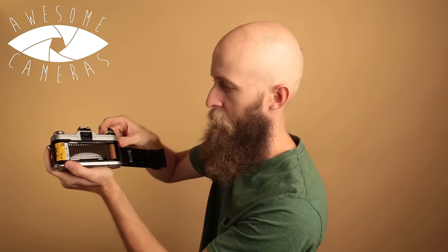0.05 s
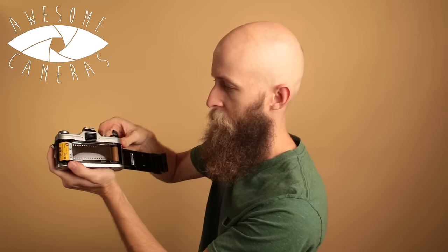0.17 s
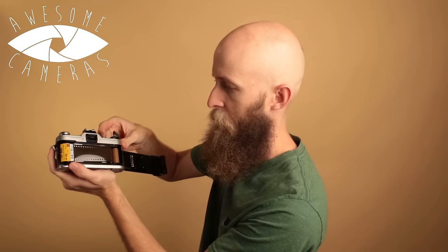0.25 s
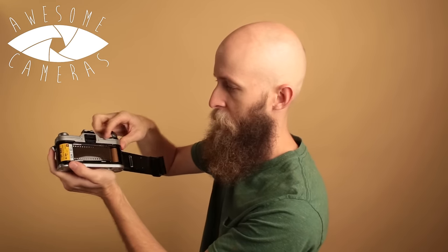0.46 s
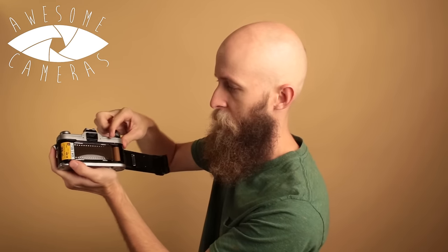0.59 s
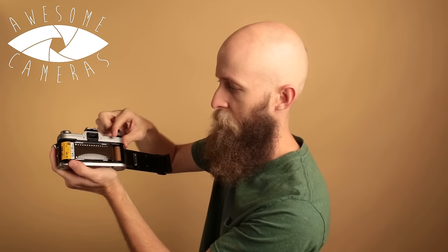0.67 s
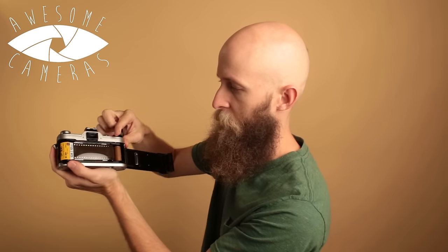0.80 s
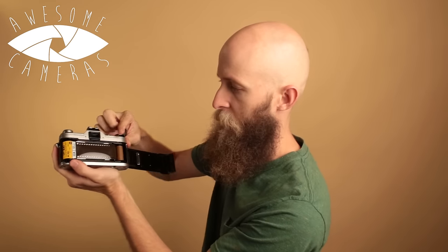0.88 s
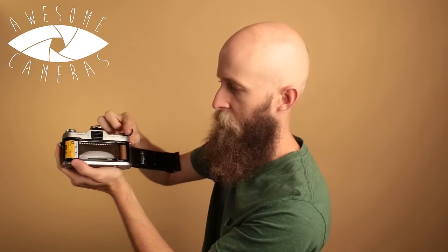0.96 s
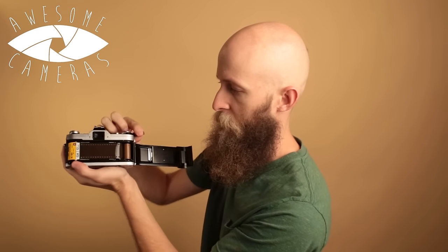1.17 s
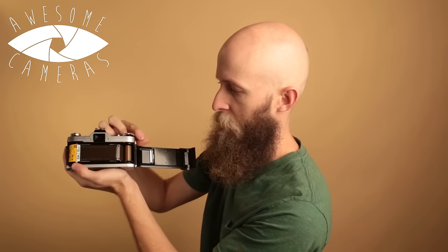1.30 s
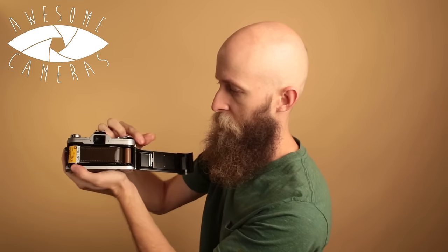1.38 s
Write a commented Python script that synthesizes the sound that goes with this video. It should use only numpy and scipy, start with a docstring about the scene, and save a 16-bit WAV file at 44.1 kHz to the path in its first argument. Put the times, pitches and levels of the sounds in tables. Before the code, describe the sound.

A film camera's mechanism clicks under someone's fingers. A sprung control snaps over and rattles to a stop with a knock, then a dial clicks, turns with a faint scrape and catches. Close, in a small, fairly echoey room.

```python
"""A film camera with its back open is worked by hand in a small, fairly echoey room.
A sprung control snaps over and rattles to a stop with a knock; fingers then click a dial, turn it
and let it catch. Each contact sounds the metal shell, a small steel spring and a bright crack,
and the camera rings on briefly. The sound is almost mono, over a faint hiss and hum."""
import sys
import numpy as np
from scipy import signal
from scipy.fft import rfft, irfft, next_fast_len
from scipy.io import wavfile
from scipy.ndimage import map_coordinates

SR = 44100
rng = np.random.default_rng(int(sys.argv[2]) if len(sys.argv) > 2 else 0)


def materialize(psi):
    """Save the field psi as 16-bit PCM at rate SR to the path in sys.argv[1].

    A 1-D psi becomes a single channel; in a 2-D psi each row is a channel.
    """
    bounded = np.clip(np.atleast_2d(psi).T, -1, 1)
    quanta = np.round(bounded * 32767).astype(np.int16)
    wavfile.write(sys.argv[1], SR, quanta)


N = 63945

# The tone colours of shell, spring, crack and hollow body. Each row: frequency in Hz, level in dB.
SHELL_COLOUR = [(100, -78.5), (600, -59), (1200, -31), (1800, -17.5), (2400, -8.5), (3000, -3.5), (3700, 4),
                (4300, -5.5), (6000, -10), (9000, -32.5)]
SPRING_COLOUR = [(400, -73), (2000, -53), (4000, -21), (4700, -6.5), (5050, 2), (5350, -1.5), (5700, -10.5),
                 (6500, -18.5), (9000, -35)]
CRACK_COLOUR = [(400, -63), (1500, -26), (5000, -3), (6500, -3), (8300, -3), (9400, -2), (10300, -3),
                (12300, -1.5), (14000, -10), (15400, -8), (16000, -14.5)]
BODY_COLOUR = [(60, -60), (180, -34), (300, -20.5), (410, -9), (540, -20.5), (700, -1.5), (1000, 2),
               (1400, -7), (2200, -9), (5000, -45.5)]


def amp(db):
    """Turn decibels into a gain."""
    return 10 ** (np.asarray(db) / 20)


def unit(x):
    """Scale a sound to an average (rms) level of 1."""
    return x / np.sqrt(np.mean(x ** 2) + 1e-20)


def along(points, hz):
    """Read between (Hz, value) points, with octaves evenly spaced."""
    freqs, values = np.transpose(points)
    return np.interp(np.log(hz + 1), np.log(freqs + 1), values)


def coloured(x, colour):
    """Filter a sound to give it a tone colour."""
    size = 2 * next_fast_len(len(x))
    gain = amp(along(colour, np.fft.rfftfreq(size, 1 / SR)))
    cepstrum = irfft(np.log(gain), size)
    # Folding this onto its first half makes the filter ring only after a hit, never before.
    cepstrum[1:size // 2] *= 2
    cepstrum[size // 2 + 1:] = 0
    return irfft(rfft(x, size) * np.exp(rfft(cepstrum)), size)[:len(x)]


def shifted(colour, pitch):
    """The same colour at another pitch."""
    return [(hz * pitch, db) for hz, db in colour]


def add(track, start, x):
    """Mix x into the track at a start time in seconds."""
    part = track[max(round(start * SR), 0):][:len(x)]
    part += x[:len(part)]


def room_tone():
    """Faint hiss and a low, wavering hum."""
    # The hiss, then its left-right difference against it. Each row: frequency in Hz, level in dB.
    hiss_colour = [(15, -41), (25, -19.5), (59, -8), (122, -6), (188, -7), (300, -12.5), (500, -12),
                   (800, -13), (1300, -17.5), (2000, -20.5), (3300, -22), (5000, -22.5), (7000, -22),
                   (15500, -23.5)]
    hiss_width = [(60, -14), (240, -13), (950, -7.5), (3770, -2.5), (15000, 3)]
    # The hum's tones. Each row: frequency in Hz, level in dB.
    hum_tones = [(59, -83.5), (80, -80.5), (192, -82)]
    t = np.arange(N) / SR
    mid, spread = (unit(coloured(rng.standard_normal(N), hiss_colour)) for _ in range(2))
    side = coloured(spread, hiss_width)
    hum = np.zeros(N)
    for hz, db in hum_tones:
        waver_radians = 0.48 * map_coordinates(rng.standard_normal(20), [t * 10])
        hum += amp(db) * np.sqrt(2) * np.sin(2 * np.pi * hz * t + waver_radians)
    return hum + amp(-71) * np.array([mid + side, mid - side])


def echo():
    """The room's answer to a click: quick bounces off hands and walls, then a fading tail."""
    # How long the tail lasts. Each row: frequency in Hz, seconds to fade by 60 dB.
    fade_times = [(200, 0.32), (900, 0.63), (3000, 0.42), (5000, 0.44), (9000, 0.51), (15000, 0.44)]
    # The colours of the tail and the quick bounces. Each row: frequency in Hz, level in dB.
    tail_colour = [(200, -10.5), (450, -12.5), (850, -9), (2000, -5), (3500, -8), (5200, -10.5), (8000, -8),
                   (15000, -15)]
    near_colour = [(300, -11.5), (1200, 1.5), (3500, -7.5), (5200, -13.5), (8000, -3), (15000, -2.5)]
    tail_rise_s, near_rise_s, near_fade_s = 0.0074, 0.0019, 0.068
    t = np.arange(SR) / SR
    hz, times, noise = signal.stft(rng.standard_normal(SR), SR, nperseg=256)
    fade = amp(-60 * times / along(fade_times, hz)[:, None])
    tail = signal.istft(noise * fade, SR, nperseg=256)[1][:SR]
    tail *= 1 - np.exp(-t / tail_rise_s)
    near = rng.standard_normal(SR) * amp(-60 * t / near_fade_s)
    near *= 1 - np.exp(-(t / near_rise_s) ** 2)
    tail = coloured(tail / np.linalg.norm(tail), tail_colour)
    return tail + coloured(near / np.linalg.norm(near), near_colour)


def room(x):
    """The direct sound and its echo sit in the centre, with a faint fizz to the sides."""
    # A faint left-right fizz, mostly in the treble and lows, that follows each sound.
    # Each row: frequency in Hz, gain in dB.
    stereo_fizz = [(300, -22.5), (1000, -46), (4500, -56), (8000, -36.5), (14000, -26.5)]
    mid = x + signal.fftconvolve(x, echo())[:N]
    side = signal.fftconvolve(x, coloured(echo(), stereo_fizz))[:N]
    return np.array([mid + side, mid - side])


def door():
    """The open back door shudders with low tones after each jolt."""
    # The door's tones. Each row: frequency in Hz, level in dB, seconds to fade by 60 dB.
    tones = [(205, -17.5, 0.14), (320, -10, 0.077), (423, -7.5, 0.083), (670, -0.5, 0.12),
             (1180, -1.5, .08)]
    # The jolts. Each row: start in seconds, level in dB.
    jolts = [(.3205, -44), (1.356, -52.5)]
    out, t = np.zeros(N), np.arange(SR // 4) / SR
    rise = 1 - np.exp(-(t / 0.0017) ** 2)
    for start, jolt_db in jolts:
        ring = sum(amp(db - 60 * t / fade_s) * np.sin(2 * np.pi * (hz * t + rng.random()))
                   for hz, db, fade_s in tones)
        add(out, start, amp(jolt_db) * rise * ring)
    return out


def rubs():
    """Fingers drag metal over metal, and many tiny slips sound the camera's parts."""
    # The strokes. Each row: start in seconds, length in seconds, level in dB.
    strokes = [(0.186, .03, -51.5), (0.392, 0.026, -39), (.56, 0.43, -70), (0.794, .025, -51.5),
               (0.965, 0.078, -60.5), (1.033, 0.04, -52.5), (1.062, 0.024, -47), (1.081, 0.067, -41.5),
               (1.155, 0.044, -50.5), (1.19, 0.27, -61), (1.317, 0.058, -47.5)]
    slips_per_s, spread_db = 1500, 4
    t = np.arange(N) / SR
    swell = sum(amp(db) * np.sin(np.pi * np.clip((t - start) / length, 0, 1))
                for start, length, db in strokes)
    parts = [(SHELL_COLOUR, 0), (SPRING_COLOUR, 0.5), (CRACK_COLOUR, -10),
             (shifted(BODY_COLOUR, .85), -20)]
    scrape = np.zeros(N)
    for colour, db in parts:
        slips = (rng.random(N) < slips_per_s / SR) * rng.choice([-1, 1], N)
        strength = amp(spread_db * rng.standard_normal(N))
        scrape += amp(db) * unit(coloured(slips * strength, colour))
    return swell * unit(scrape)


def ringing(x):
    """Add the tones that the camera keeps ringing with after each contact."""
    # The camera's tones. Each row: frequency in Hz, gain in dB, seconds to fade by 60 dB.
    tones = [(1016, 4.5, 0.27), (1409, 7.5, 0.066), (1883, 5, 0.21), (3120, -7, .12), (3630, -6, .18),
             (3832, -15.5, 0.18), (4950, -7, 0.33), (5030, -14, .22), (5850, -2, 0.12), (8340, 2, .12),
             (9200, -1, 0.086), (12400, -7, .04)]
    t = np.arange(SR // 3) / SR
    ring = np.zeros(len(t))
    for hz, db, fade_s in tones:
        decay = amp(-60 * t / fade_s)
        ring += amp(db) * 2 * decay / decay.sum() * np.sin(2 * np.pi * (hz * t + rng.random()))
    return x + signal.fftconvolve(x, ring)[:N]


def burst(swell_ms, colour, pitch=1, size=2048):
    """A brief chatter of contact sounds one part, peaking after swell_ms."""
    age = np.arange(size) / SR * 1000 / max(swell_ms, .25)
    shape = age * np.exp((1 - age * age) / 2)
    chatter = rng.standard_normal(size)
    for _ in range(3):  # even out the noise across all frequencies
        phases = np.angle(rfft(chatter * shape))
        chatter = np.sign(irfft(np.exp(1j * phases)))
    return unit(coloured(chatter * shape, shifted(colour, pitch))) * np.sqrt(np.mean(shape ** 2))


def dial():
    """The dial sings briefly as it slips."""
    # The slips. Each row: start in seconds, swell in milliseconds, level in dB.
    slips = [(0.8149, 2.6, -34), (.855, 11, -56.5), (.89, 14, -73), (.975, 11, -66.5), (1.015, 14, -55.5)]
    # The dial's colour. Each row: frequency in Hz, level in dB.
    dial_colour = [(1000, -72), (2600, -33), (3300, -3), (3650, 0), (3850, -4), (4150, -10), (5500, -39),
                   (9000, -66)]
    out = np.zeros(N)
    for start, swell_ms, db in slips:
        add(out, start, amp(db) * burst(swell_ms, dial_colour))
    return out


def knocks():
    """Some blows reach the hollow body and make it knock."""
    # The blows. Each row: start in seconds, swell in milliseconds, level in dB, pitch as a ratio.
    blows = [(.2235, 1.6, -50, 0.83), (.282, 1.87, -43, 0.91), (0.3185, 1.534, -27, 1.01),
             (0.5772, 1.605, -54, 1.01), (1.3338, 2, -58, 1.24), (1.355, 5, -53, .9)]
    out = np.zeros(N)
    for start, swell_ms, db, pitch in blows:
        add(out, start, amp(db) * burst(swell_ms, BODY_COLOUR, pitch))
    return out


def clicks():
    """Metal hits metal, sounding the shell, the spring, a crack and the back plate."""
    # The contacts. Each row: start in seconds, swell in milliseconds,
    # shell, spring and crack levels in dB, the shell's pitch as a ratio.
    contacts = [(0.025, 1, -76.5, -69, -61, 0.55), (0.1904, 1.84, -44.5, -59, -82, 0.78),
                (0.2183, 1.5, -33, -40, -41.5, 0.81), (.2212, .8, -17, -26, -22, 1),
                (0.2233, .9, -14, -6.5, -19, 0.97), (0.2475, 1.1, -17, -22.5, -34.5, 0.98),
                (0.2541, 1.1, -31, -35, -27.5, 1), (.2562, 1.1, -27.5, -26.5, -29.5, 1),
                (0.2633, 1.2, -39.5, -21, -27, 1), (0.2651, 1, -26.5, -16.5, -35, 0.86),
                (0.266, 1, -38.5, -19, -36.5, 0.65), (.2753, 1.2, -37.5, -26.5, -41, 0.66),
                (.281, 1.2, -27, -19.5, -29.5, 0.9), (0.287, 1.8, -29.5, -46, -33.5, 0.84),
                (0.291, .9, -33, -33, -43, 0.75), (0.2988, .7, -40, -22.5, -35.5, 0.54),
                (0.317, 1.3, -30, -25.5, -46, 0.87), (0.3178, 1.3, -28, -24.5, -28.5, 0.88),
                (.3208, .9, -24, -16.5, -36, 0.98), (.4028, 1.1, -39.5, -33, -42, 0.92),
                (.4425, .6, -48, -41, -70, 0.76), (0.4942, .7, -71.5, -43, -57, 1),
                (0.5746, 1.2, -60, -65, -70, 1), (.5972, .8, -51.5, -55.5, -51, 0.8),
                (0.6978, 1, -60.5, -78, -80, 0.68), (0.7795, .6, -42, -46, -75.5, 0.94),
                (0.8137, 1.3, -37, -37.5, -40.5, 1), (0.8159, 1.7, -37.5, -51.5, -51.5, 0.942),
                (0.8225, 1, -45.5, -30.5, -40.5, 0.69), (1.005, 1.1, -51, -54, -64, 0.85),
                (1.0209, 1.2, -53, -46, -54.5, 0.93), (1.0588, 1, -58, -49.5, -82, 0.73),
                (1.1019, .9, -49, -53.5, -40.5, 0.54), (1.1068, .9, -69, -48, -42.5, 0.88),
                (1.1128, .9, -45, -38, -54.5, 0.81), (1.1224, 1, -41, -42, -54.5, 0.92),
                (1.1667, .35, -36, -39, -71, 0.81), (1.1815, .7, -40.5, -50, -75, 0.75),
                (1.211, .8, -66, -72, -57.5, 1), (1.2459, .6, -45.5, -52, -67, 0.81),
                (1.2947, .5, -47.5, -60, -76, 0.72), (1.318, 1, -50, -37.5, -45, 0.75),
                (1.3321, 1.2, -40, -41, -59.5, 1), (1.3412, 0.83, -37, -32, -36.5, 0.66),
                (1.354, 1.1, -35.5, -41, -36.5, 0.91), (1.3577, 1.1, -31, -32, -35.5, .75),
                (1.3676, 1.1, -36.5, -31, -49, 0.96)]
    # The back plate's colour. Each row: frequency in Hz, level in dB.
    plate_colour = [(100, -57.5), (400, -42), (700, -28), (900, 0), (1400, 2.5), (1700, -6), (2500, -15.5),
                    (5000, -34)]
    out = np.zeros(N)
    for start, swell_ms, shell_db, spring_db, crack_db, pitch in contacts:
        shell = amp(shell_db) * burst(swell_ms, SHELL_COLOUR, pitch)
        spring = amp(spring_db) * burst(swell_ms, SPRING_COLOUR)
        crack = amp(crack_db) * burst(swell_ms, CRACK_COLOUR)
        plate_db = -15.5 + 1.117 * shell_db  # the plate flexes more under hard contacts
        plate = amp(plate_db) * burst(swell_ms, plate_colour)
        add(out, start, shell + spring + crack + plate)
    return out


def scene():
    """The camera in the room; its hits and its rubs each get their own echo."""
    hits = ringing(clicks() + knocks() + dial()) + door()
    return room(hits) + room(ringing(rubs())) + room_tone()


def record(dry):
    """Cut away the very highest treble."""
    top_hz = 15850
    size = next_fast_len(N + SR // 2)
    passes = np.fft.rfftfreq(size, 1 / SR) < top_hz
    return irfft(rfft(dry, size) * passes, size)[:, :N]


dry = scene()
out = record(dry)
materialize(out)
```